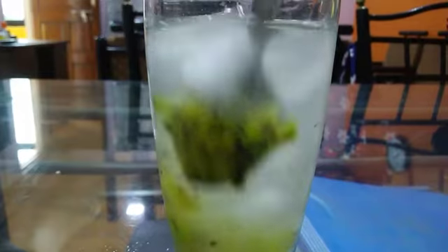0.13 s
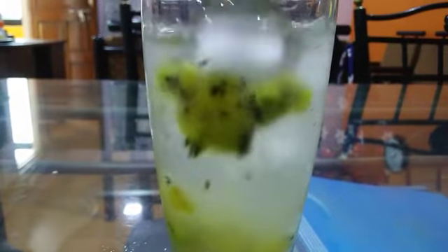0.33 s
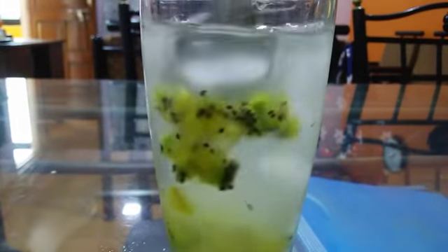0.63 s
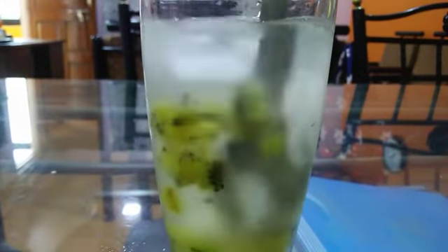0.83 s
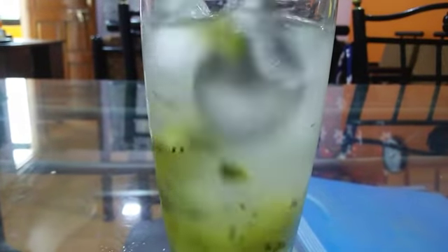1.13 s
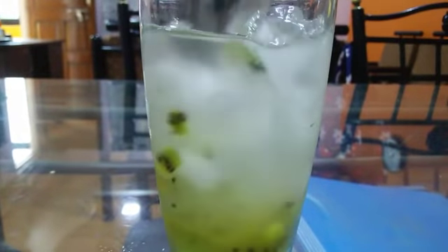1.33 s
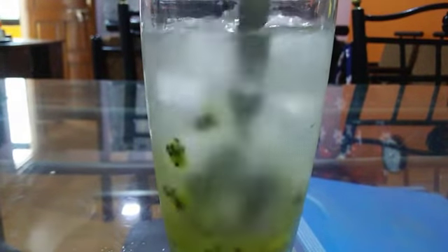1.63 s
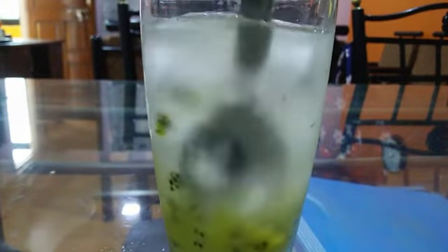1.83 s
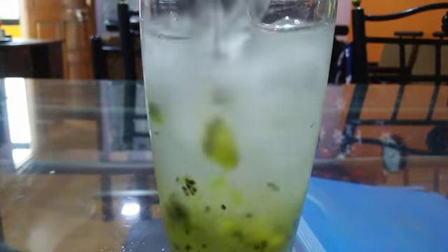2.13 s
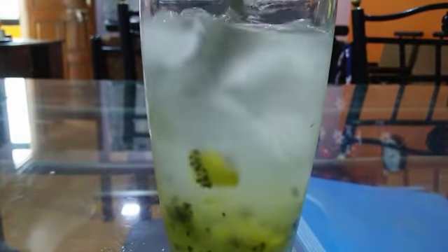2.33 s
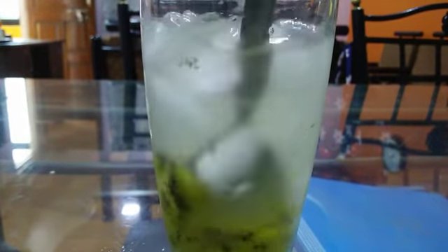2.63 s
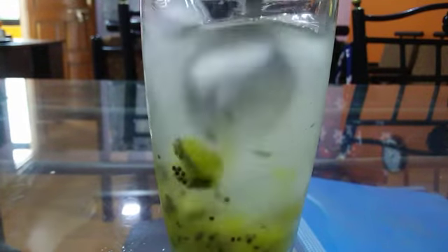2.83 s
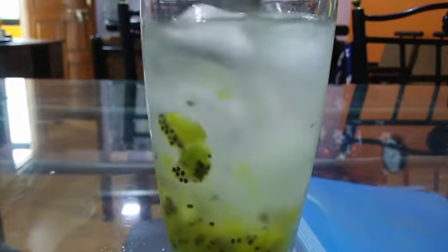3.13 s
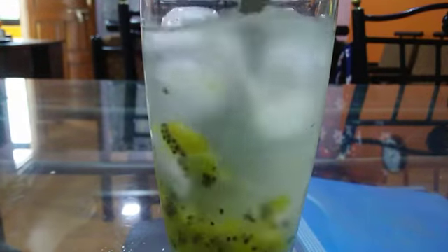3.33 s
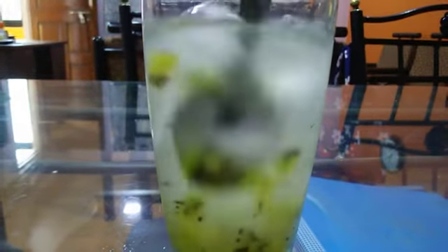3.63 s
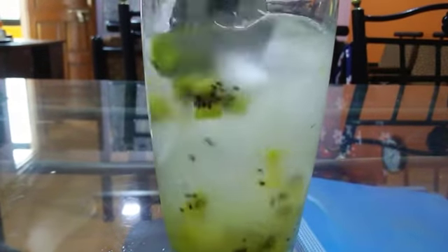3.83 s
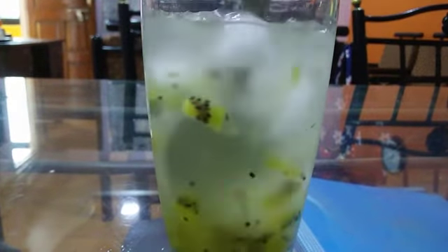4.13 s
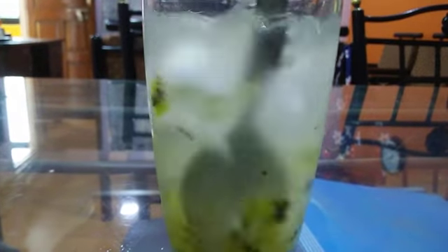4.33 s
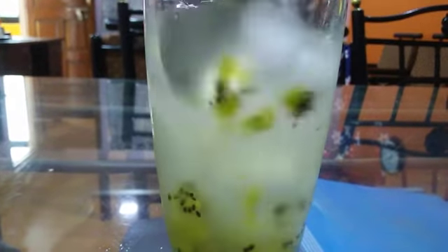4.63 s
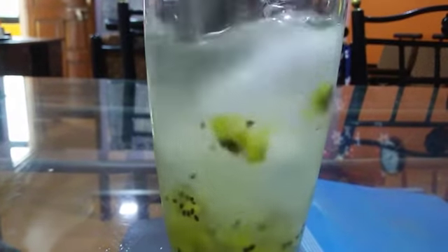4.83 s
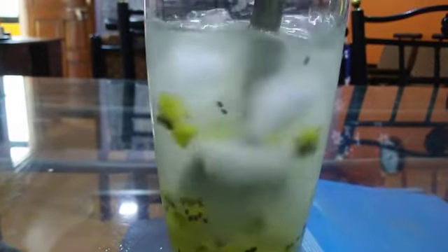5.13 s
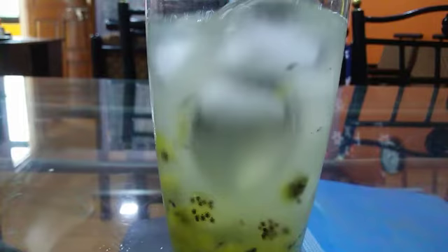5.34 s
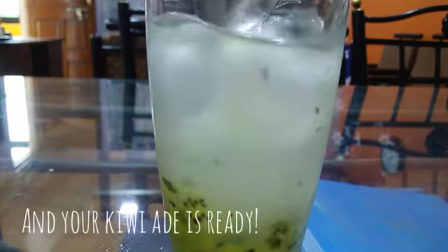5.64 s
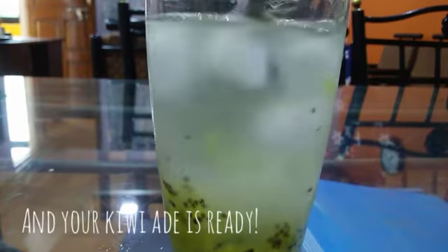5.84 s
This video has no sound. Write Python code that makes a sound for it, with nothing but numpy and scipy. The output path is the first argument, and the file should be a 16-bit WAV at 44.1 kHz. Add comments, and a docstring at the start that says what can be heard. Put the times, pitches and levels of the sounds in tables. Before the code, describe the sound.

A metal spoon stirs ice in a tall, full glass on a table. Sparse clinks and muffled knocks at first soon become a dense, irregular stream of bright glass taps, ice ticks and light slosh. It thins slightly near the end but never stops. Soft bubble hiss and a faint, very high whine sit underneath. Small room, one close microphone, little bass.

```python
"""Bright clinks stand out: ice cubes and a metal spoon tap the wall of a tall, full glass being stirred.
Each clink rings two fading modes of the wall, with a tick of ice, a metal edge and a brief chatter.
Cubes knock dully through the table, and many random touches make the rattle and slosh of stirring.
Tiny bursting bubbles hiss, a small room answers with fading noise echoes, and a faint high whine
made of steady tones switches on and off. One close microphone hears it all."""
import sys
import numpy as np
from scipy import signal
from scipy.io import wavfile
from scipy.ndimage import uniform_filter1d

SR = 44100
rng = np.random.default_rng(int(sys.argv[2]) if len(sys.argv) > 2 else 0)


def materialize(psi):
    """Save the field psi as 16-bit PCM at rate SR to the path in sys.argv[1].

    A 1-D psi becomes a single channel; in a 2-D psi each row is a channel.
    """
    bounded = np.clip(np.atleast_2d(psi).T, -1, 1)
    quanta = np.round(bounded * 32767).astype(np.int16)
    wavfile.write(sys.argv[1], SR, quanta)


N = 264159  # length in samples

# modes of the lower wall ring: (ratio_to_ring_pitch, relative_level_db, time_to_fall_60_db_s)
LOWER_RING = [(1, -2, .14), (.943, -6, .1), (1.025, -10, .08), (.968, -9, .08)]
# low modes of the table top: (pitch_hz, relative_level_db, time_to_fall_60_db_s)
TABLE_LOW = [(456, -7.5, 0.08), (518.7, -10.5, 0.14), (573, -10, .12), (644, -8, .12), (720.6, -4.5, 0.13),
             (824, -10, 0.23)]
# jostling of the cubes as the spoon works: (time_s, base_level_of_small_touches_db)
STIR = [(0.0, -42.5), (0.1, -56.5), (0.25, -61.5), (0.45, -50.5), (0.75, -51), (0.9, -42.5), (1.07, -42),
        (1.14, -48.5), (1.3, -51), (1.38, -50.5), (1.47, -41), (1.8, -49), (2.1, -46), (2.26, -61),
        (2.32, -45.5), (2.8, -48), (2.9, -46), (3.2, -49.5), (3.32, -44.5), (3.7, -50), (3.78, -54),
        (4.1, -45), (4.45, -47.5), (4.7, -54.5), (4.77, -48.5), (4.95, -49.5), (5.0, -43), (5.2, -51),
        (5.75, -52.5), (5.85, -49.5), (5.99, -50)]
TABLE_CUT_HZ = 460  # blows and rumble lose what lies below this


def undb(db):
    """Turn decibels into gain."""
    return 10 ** (np.asarray(db) / 20)


def unit(x):
    """Scale to an rms (average strength) of 1."""
    return x / np.sqrt(np.mean(x ** 2))


def band(x, hz, width):
    """Keep a band of pitches of the given width in Hz, with gentle slopes."""
    edges = [max(hz - width / 2, 20), hz + width / 2]
    return signal.sosfilt(signal.butter(2, edges, "bandpass", fs=SR, output="sos"), x)


def steep(x, hz, kind):
    """Cut steeply below hz ("highpass") or above it ("lowpass")."""
    return signal.sosfilt(signal.butter(6, hz, kind, fs=SR, output="sos"), x)


def curves(table):
    """Join the points of each table column into a curve with one value per sample."""
    time_s, *columns = np.transpose(table)
    return [np.interp(np.arange(N) / SR, time_s, column) for column in columns]


def wander(per_s):
    """Random levels, each held for 1 / per_s seconds, with smoothed steps and an rms of 1."""
    hold = int(SR / per_s)
    steps = np.repeat(rng.standard_normal(N // hold + 1), hold)[:N]
    return unit(uniform_filter1d(steps, size=hold // 2))


def touches(per_s, scatter_db):
    """Random small contacts, some stronger than the rest."""
    hit = rng.random(N) < per_s / SR
    boost = np.minimum(rng.exponential(size=N), np.pi)
    return hit * rng.standard_normal(N) * undb(scatter_db * boost)


def ring(start_s, hz, db, t60, spread_db=3.5, detune=0.0069, push_ms=0.41, in_step=False):
    """One decaying mode (60 dB down after t60 seconds); each blow excites it a little differently."""
    t = np.arange(int(t60 * SR)) / SR
    chance = rng.standard_normal((len(start_s), 3))
    hz = (hz * (1 + detune * chance[:, 0]))[:, None]
    sign = 1 if in_step else np.sign(chance[:, 2])
    gain = undb(db + spread_db * chance[:, 1]) * sign
    decay = undb(-60 * t / t60)
    push = 1 - np.exp(-t * 1000 / push_ms)
    waves = gain[:, None] * np.sin(2 * np.pi * hz * t) * decay * push
    # add every wave into one track at its own moment
    at = (np.asarray(start_s) * SR).astype(int)[:, None] + np.arange(len(t))
    return np.bincount(at.ravel(), waves.ravel(), N + SR)[:N]


def whine():
    """A steady cluster of high tones, mostly 200 Hz apart, gated on and off."""
    # tones: (pitch_hz, rms_level_db)
    whine_tones = [(12000, -91), (12800, -97), (13000, -89), (13200, -97), (13400, -93), (13600, -83),
                   (13800, -82), (14000, -72), (14200, -89), (14400, -96)]
    # longer stretches of whine: (start_s, end_s)
    held_spans = [(.29, .45), (.845, 1.04), (1.58, 1.72), (2.125, 2.69), (2.99, 3.255), (3.5, 3.675),
                  (4.78, 4.925), (5.1, 5.825)]
    first_s, every_s, blip_s = .3, .32, .03  # short blips at a steady beat
    t = np.arange(N) / SR
    blips = (t > first_s) & ((t - first_s) % every_s < blip_s)
    held = np.any([(t > start) & (t < end) for start, end in held_spans], axis=0)
    on = blips | held
    tones = sum(np.sqrt(2) * undb(db) * np.sin(2 * np.pi * (hz * t + rng.random()))
                for hz, db in whine_tones)
    return tones * uniform_filter1d(1. * on, size=200)  # soften each switch


def spray():
    """Tiny bursting bubbles at the surface, dense enough to hiss."""
    # base levels, before the mix below: (time_s, airy_hiss_db, lower_hiss_db)
    spray_levels = [(0.0, -88, -70), (0.28, -97, -92), (0.65, -91, -83), (0.84, -96, -39.5),
                    (0.98, -76, -44.5), (1.13, -74, -44), (1.27, -86, -52), (1.5, -87, -67),
                    (1.79, -91, -52), (1.97, -89, -74), (2.15, -89, -54), (2.53, -89, -58),
                    (2.69, -98, -71), (3.09, -84, -62), (3.6, -86, -58.5), (3.87, -91, -60),
                    (4.0, -92, -73), (4.75, -90, -69), (5.04, -89, -66), (5.22, -92, -43), (5.3, -94, -67),
                    (5.54, -87, -71), (5.99, -89, -53)]
    airy_db, lower_db = curves(spray_levels)
    fizz = touches(9000, 1.7)
    airy = unit(band(fizz, 10550, 2400)) + undb(-1.5) * unit(band(fizz, 13600, 3600))
    wide = unit(band(fizz, 5850, 3500)) * undb(lower_db - 7)
    narrow = unit(band(fizz, 5850, 500)) * undb(lower_db - 21.0)
    return airy * undb(airy_db) + wide + narrow


def swells():
    """Gains of the low rumble: a fast rise, a hold and a fade, at a set rate for each layer."""
    # swells of low rumble: (start_s, hold_s, rumble_db, low_part_db, deep_part_db)
    swell_rows = [(0.0, 0.013, -57.5, -71, -74), (0.36, .05, -64, -70, -84), (0.43, 0.21, -56.5, -64, -79),
                  (0.636, 0.1, -45, -57.5, -74), (0.765, 0.13, -47.5, -58, -74), (0.928, .1, -49, -59, -75),
                  (1.101, 0.17, -52.5, -53.5, -61.5), (1.449, .06, -45, -57.5, -63),
                  (1.57, 0.088, -50.5, -56.5, -70), (1.748, 0.074, -48, -50, -59),
                  (1.92, 0.14, -54, -61.5, -76), (2.307, .1, -53, -55, -73),
                  (2.398, 0.18, -52.5, -52.5, -63), (2.598, 0.078, -48.5, -53.5, -67),
                  (2.86, 0.03, -48.5, -62, -70), (2.96, 0.034, -51, -63.5, -69),
                  (3.07, 0.079, -52, -52, -62.5), (3.227, 0.16, -49.5, -56, -70),
                  (3.546, 0.13, -45.5, -57, -71), (3.74, 0.21, -57, -55, -61.5),
                  (4.064, 0.12, -53, -61.5, -74), (4.27, .08, -49, -56, -70),
                  (4.37, .22, -54.5, -53.5, -60), (4.74, 0.12, -62, -79.5, -77.5),
                  (4.991, 0.3, -52, -55.5, -58.5), (5.487, 0.17, -58.5, -80, -78),
                  (5.813, .09, -50, -51.5, -62), (5.93, .06, -55, -56, -58)]
    attack_s = 0.0093
    fades_db_per_s = (80.5, 125, 202)  # rumble, low part, deep part
    t = np.arange(0, N, 64) / SR  # a coarse time grid is enough for slow gains
    start, hold, *levels = np.transpose(swell_rows)[:, :, None]
    rise = np.clip((t - start) / attack_s, 0, 1)
    after = np.maximum(t - start - hold, 0)
    # where swells overlap, the strongest one counts
    gains = [(rise * undb(db - fade * after)).max(axis=0) for db, fade in zip(levels, fades_db_per_s)]
    return [np.interp(np.arange(N) / SR, t, gain) for gain in gains]


def hum(ring_hz):
    """Small touches keep the lower ring sounding; each mode remembers them for a while."""
    turns = np.cumsum(ring_hz) / SR
    out = 0
    for ratio, db, t60 in LOWER_RING:
        # two sets of touches push the mode's two quarter-turn-apart parts
        push_a = uniform_filter1d(touches(1500, 1.8), size=60)
        push_b = uniform_filter1d(touches(1500, 2.8), size=60)
        kept_per_sample = undb(-60 / t60 / SR)
        swing = signal.lfilter([1], [1, -kept_per_sample], push_a + 1j * push_b)
        wave = (swing * np.exp(2j * np.pi * ratio * turns)).real
        out = out + undb(db) * unit(wave)
    return out


def churn(ring_hz):
    """Cubes jostle all the time: many small touches feed table, wall and ice; the drink sloshes."""
    # bands of the ice rattle: (pitch_hz, width_hz, relative_level_db)
    rattle_bands = [(1183, 110, -8), (1392, 260, -6), (2010, 610, 2.5), (2670, 400, -2), (3400, 750, -1.5),
                    (4450, 140, -0.5), (5235, 760, -6), (5800, 1200, -19.5), (8000, 2100, -35)]
    rattle_flicker_db, hum_db, hum_flicker_db = 3.5, -4, 3  # hum_db is relative to the rattle
    contact_hz, tick_scatter_db = 8500, 4.6  # the touches are dull above contact_hz
    stir_db = curves(STIR)[0]
    rattle_gain = undb(stir_db + rattle_flicker_db * wander(25))
    hum_gain = undb(stir_db + hum_db + hum_flicker_db * wander(14))

    bumps = touches(900, 3.2)
    rumble = sum(undb(db) * unit(band(bumps, hz, 54)) for hz, db, _ in TABLE_LOW)
    rumble = rumble + 1.7 * unit(band(bumps, 668, 520))
    rumble = steep(rumble, TABLE_CUT_HZ, "highpass")

    slosh = touches(350, 2.2)
    low = band(band(slosh, 392, 140), 392, 140)
    deep = band(band(slosh, 272, 220), 272, 220)

    ticks = steep(touches(1800, tick_scatter_db), contact_hz, "lowpass")
    rattle = sum(undb(db) * unit(band(ticks, hz, width)) for hz, width, db in rattle_bands)

    layers = (rumble, low, deep, rattle, hum(ring_hz))
    gains = (*swells(), rattle_gain, hum_gain)
    return sum(unit(layer) * gain for layer, gain in zip(layers, gains))


def knocks():
    """Cubes and spoon knock on the bottom: a short thump at its own pitch, then the table top hums on."""
    # dull knocks, base levels: (start_s, thump_and_low_table_db, upper_table_modes_db, pitch_hz)
    knock_rows = [(0.071, -41.5, -36, 750), (0.165, -43, -34, 707), (0.238, -69, -45.5, 616),
                  (0.29, -69, -40.5, 880), (0.363, -44.5, -36.5, 810), (0.482, -44, -31.5, 790),
                  (0.54, -46, -36, 700), (0.632, -32, -37, 736), (0.712, -28.5, -35, 707),
                  (0.764, -48, -51, 580), (0.854, -29, -24.5, 660), (0.954, -34.5, -35, 703),
                  (1.045, -33, -33, 820), (1.203, -28, -32.5, 666), (1.392, -40, -43, 693),
                  (1.436, -39, -31.5, 655), (1.501, -30.5, -35, 726), (1.59, -25.5, -32, 603),
                  (1.655, -34.5, -37, 612), (1.746, -41, -42, 737), (1.922, -35.5, -65, 640),
                  (2.009, -26, -38, 627), (2.135, -40.5, -38, 794), (2.193, -36, -58, 630),
                  (2.284, -33, -58, 424), (2.35, -34, -38, 590), (2.386, -29, -46, 505),
                  (2.593, -30.5, -37, 536), (2.722, -33, -27.5, 650), (2.774, -34.5, -30, 685),
                  (2.866, -30.5, -29, 626), (2.967, -37.5, -53, 807), (3.125, -32, -44.5, 620),
                  (3.25, -28.5, -42, 516), (3.438, -39, -42, 620), (3.476, -38.5, -42, 650),
                  (3.56, -26.5, -28, 587), (3.727, -31.5, -42, 610), (3.789, -31.5, -37, 640),
                  (3.904, -32, -51, 610), (3.934, -31.5, -45, 520), (4.081, -32.5, -36, 841),
                  (4.19, -32, -39, 647), (4.262, -22, -22.5, 708), (4.395, -24.5, -29, 615),
                  (4.463, -35, -43, 690), (4.592, -32, -41, 606), (4.721, -49, -40, 650),
                  (4.75, -37.5, -50, 630), (4.813, -34, -37, 743), (4.934, -54, -38, 740),
                  (5.007, -23, -33, 610), (5.13, -41, -58, 594), (5.186, -31.5, -34, 714),
                  (5.5, -37.5, -39, 590), (5.601, -42, -42, 663), (5.783, -42, -46, 545),
                  (5.828, -36, -39, 456), (5.851, -28, -51, 496), (5.9, -41, -55, 760)]
    # upper modes of the table top: (pitch_hz, relative_level_db, time_to_fall_60_db_s)
    table_high = [(1054, -17, 0.14), (1166.4, -7.5, 0.14), (1233.4, -4, 0.059)]
    start_s, low_db, high_db, pitch_hz = np.transpose(knock_rows)
    thump = ring(start_s, pitch_hz, low_db + 0.5, 0.033, spread_db=2.1, push_ms=2.34)
    low = sum(ring(start_s, hz, low_db + db - 7.5, t60, spread_db=2.5, push_ms=3.5)
              for hz, db, t60 in TABLE_LOW)
    high = sum(ring(start_s, hz, high_db + db, t60, spread_db=2.0, push_ms=0.4)
               for hz, db, t60 in table_high)
    return thump + low + high


def light_clinks():
    """Light clinks between the loud ones, at random moments, as strong as the stirring."""
    per_s, scatter_db = 20, 3.5
    upper_db, lower_db, tick_db, edge_db = 10.5, 2, 6.5, -1  # relative to the stirring level
    upper_hz, upper_spread_hz = 4460, 150
    tick_low_hz, tick_high_hz = 2060, 3700
    count = int(per_s * N / SR)
    chance = rng.standard_normal((count, 5)).T
    place = rng.random((count, 2)).T
    start_s = place[0] * N / SR
    db = np.interp(start_s, *np.transpose(STIR)) + scatter_db * chance[:4]
    tick_hz = tick_low_hz + (tick_high_hz - tick_low_hz) * place[1]
    return np.transpose([start_s, db[0] + upper_db, upper_hz + upper_spread_hz * chance[4],
                         db[1] + lower_db, db[2] + tick_db, tick_hz, db[3] + edge_db])


def clinks(ring_hz):
    """Each clink rings both wall modes, with a tick of ice, a bright metal edge and a brief chatter."""
    # loud clinks, base levels: (start_s, upper_ring_db, upper_ring_hz, lower_ring_db,
    # ice_tick_db, tick_hz, bright_edge_db)
    loud_clinks = [(0.0041, -22, 4460, -44, -40, 3750, -48), (0.1076, -32.5, 4320, -34.5, -31, 2050, -65),
                   (0.1337, -37.5, 4450, -48, -44, 2170, -55), (0.1716, -39.5, 4500, -36.5, -36, 3000, -50),
                   (0.2905, -36.5, 4360, -38, -26.5, 2070, -49), (0.3589, -36.5, 4750, -41, -32, 2140, -54),
                   (0.437, -45, 4530, -40, -33.5, 2060, -65), (0.4575, -42, 4430, -46, -33, 3730, -61),
                   (0.4729, -27, 4520, -32, -41, 3280, -37), (0.4826, -16, 4540, -30.5, -20.5, 2140, -35),
                   (0.5069, -31, 4460, -40, -36, 2050, -41), (0.5283, -26, 4480, -53, -36, 2090, -33.5),
                   (0.5386, -30, 4570, -41, -30.5, 3690, -40), (0.5853, -32, 4680, -36, -30, 2650, -41),
                   (0.6307, -32, 4430, -54, -30, 3740, -46), (0.6607, -34, 4460, -30.5, -29, 2050, -49),
                   (0.7528, -55, 4210, -42, -38, 2630, -37), (0.8302, -52, 4530, -35, -31, 2170, -38),
                   (0.8563, -35, 4640, -27.5, -20, 2440, -37), (0.868, -27.5, 4480, -27, -21.5, 2250, -33),
                   (0.8876, -34, 4520, -35, -33, 2160, -39), (0.9156, -44, 4300, -42, -36, 2060, -43),
                   (0.9513, -21, 4460, -40, -31, 2050, -43), (1.0123, -43, 4600, -42, -29.5, 2940, -41),
                   (1.0487, -42, 4600, -45, -25.5, 3560, -23), (1.0917, -29, 4530, -32.5, -33, 2070, -40),
                   (1.2024, -33, 4520, -33, -25, 3300, -35), (1.2265, -26.5, 4530, -24.5, -28, 3700, -44),
                   (1.2402, -25, 4500, -28, -21, 3680, -38), (1.2498, -30, 4030, -49, -28, 2050, -35),
                   (1.2763, -27, 4440, -55, -27, 3680, -29), (1.3239, -37, 4340, -43, -36, 3550, -43),
                   (1.3318, -26, 4510, -45, -37, 3000, -45), (1.3467, -32, 4620, -50, -33, 3500, -33.5),
                   (1.4259, -28, 4430, -52, -41, 3040, -36), (1.4367, -16, 4460, -23.5, -25, 3730, -39),
                   (1.4468, -30, 4440, -40, -41, 3700, -34), (1.4829, -24.5, 4420, -44, -35, 3530, -31),
                   (1.4997, -33, 4430, -33, -33, 3400, -37), (1.5521, -26, 4450, -28.5, -35, 2060, -45),
                   (1.6042, -31.5, 4260, -32, -30.5, 2570, -42),
                   (1.6746, -20.5, 4470, -48, -23.5, 2780, -44), (1.7365, -23.5, 4470, -49, -52, 3610, -29),
                   (1.766, -18.5, 4470, -32.5, -23, 2210, -24), (1.813, -30, 4450, -52, -41, 3450, -32),
                   (1.8444, -27.5, 4480, -41, -36, 2050, -29), (1.884, -19, 4450, -32, -20.5, 2760, -19),
                   (1.9228, -20.5, 4480, -32, -32, 2210, -37), (1.9496, -31, 4460, -33, -47, 2050, -34),
                   (1.9659, -22, 4460, -33.5, -35, 2100, -31.5), (2.0007, -30, 4460, -28, -34, 2450, -47),
                   (2.073, -22.5, 4500, -31, -41, 3400, -45), (2.0883, -32, 4430, -35, -41, 2050, -49),
                   (2.1085, -29.5, 4560, -41, -43, 2960, -39), (2.1344, -17, 4420, -35, -25, 2030, -23),
                   (2.1868, -31, 4330, -43, -37, 3360, -49),
                   (2.1955, -17.5, 4470, -28.5, -24.5, 2920, -27.5),
                   (2.2827, -29.5, 4580, -41, -22, 3580, -33), (2.2951, -29, 4540, -33, -33, 3390, -36),
                   (2.3122, -30, 4340, -30, -29, 2010, -34), (2.3522, -25.5, 4420, -26.5, -28, 2050, -32),
                   (2.371, -33, 4300, -32, -35, 2480, -39), (2.397, -23, 4410, -38, -39, 2050, -24),
                   (2.4118, -26, 4510, -36, -45, 3420, -35), (2.4379, -26, 4520, -36, -39, 2050, -41),
                   (2.4943, -23.5, 4500, -43, -35, 3690, -46), (2.5137, -28, 4470, -48, -38, 3690, -45),
                   (2.5279, -23, 4460, -29.5, -33, 2640, -33), (2.5516, -26, 4460, -46, -33, 3240, -42),
                   (2.5935, -25.5, 4500, -42, -18, 3330, -29), (2.6285, -19.5, 4440, -38, -29.5, 2730, -34),
                   (2.6425, -28, 4620, -54, -22, 2600, -44), (2.6492, -22.5, 4430, -38, -35, 3640, -41),
                   (2.6629, -22, 4460, -31, -29, 2020, -36), (2.6918, -27.5, 4480, -39, -31, 2740, -40),
                   (2.7239, -30.5, 4580, -26, -29, 2110, -47), (2.7381, -31, 4390, -36, -36, 2540, -53),
                   (2.8038, -32, 4450, -43, -39, 2080, -55), (2.8597, -24, 4480, -28, -34, 2860, -39),
                   (2.8666, -18.5, 4380, -24, -23.5, 2050, -41), (2.8731, -20.5, 4410, -34, -34, 3690, -37),
                   (2.8847, -28, 4420, -26.5, -33, 2050, -34), (2.9015, -21, 4450, -46, -37, 3610, -41),
                   (2.9096, -19, 4350, -34, -27, 3690, -30), (2.95, -26, 4390, -42, -30, 3000, -33),
                   (2.9625, -30, 4500, -42, -30, 3300, -30), (2.9669, -20, 4510, -37, -28, 3300, -29.5),
                   (2.9913, -23.5, 4460, -46, -32, 2950, -31.5), (3.0366, -26.5, 4580, -27, -24, 3330, -30),
                   (3.0842, -25.5, 4550, -47, -41, 3360, -37), (3.1146, -30, 4600, -42, -32, 3500, -47),
                   (3.1254, -26, 4460, -40, -21.5, 3420, -41), (3.1355, -27.5, 4600, -33, -34, 3570, -42),
                   (3.1608, -26, 4490, -52, -39, 3460, -48), (3.2089, -25, 4500, -45, -46, 2060, -42),
                   (3.223, -23, 4530, -45, -40, 3690, -33), (3.2505, -16.5, 4580, -27, -31.5, 2050, -18),
                   (3.2629, -20.5, 4450, -33.5, -32, 3400, -36),
                   (3.2875, -20.5, 4520, -36, -31, 2050, -30.5), (3.3144, -20.5, 4540, -52, -24, 2530, -30),
                   (3.3318, -20.5, 4570, -52, -26, 2630, -37), (3.4241, -33, 4640, -35, -38, 2890, -36),
                   (3.4388, -13, 4530, -27, -35, 2050, -26.5), (3.4889, -19.5, 4460, -35, -32, 2740, -44),
                   (3.5318, -32.5, 4360, -49, -38, 2620, -42), (3.5585, -22, 4500, -32, -28, 2600, -36),
                   (3.563, -18, 4530, -22.5, -18, 2060, -31), (3.5962, -32, 4400, -36, -26, 2500, -36),
                   (3.6, -24, 4570, -31, -23, 2800, -36), (3.6166, -17, 4460, -26, -23, 2480, -29),
                   (3.6376, -23, 4400, -28, -22, 3450, -27), (3.6721, -26, 4400, -33, -33, 2360, -38),
                   (3.728, -51, 4660, -52, -35, 2470, -60), (3.754, -38, 4450, -41, -32, 3420, -47),
                   (3.789, -12, 4490, -31, -19.5, 2500, -15), (3.7989, -39, 4460, -52, -37, 2360, -41),
                   (3.903, -28.5, 4850, -32, -33, 2660, -33), (3.9358, -22.5, 4530, -49, -23, 3690, -40),
                   (3.9499, -27, 4820, -44, -26.5, 3530, -33.5), (3.9676, -26, 4580, -48, -30, 3570, -33),
                   (4.01, -26.5, 4460, -38, -30, 3400, -38), (4.0644, -37, 4620, -34, -27, 2640, -33),
                   (4.0826, -25.5, 4120, -27.5, -24.5, 2540, -35.5),
                   (4.144, -29, 4560, -49, -33, 3670, -35), (4.1636, -30, 4120, -36, -30.5, 3700, -43),
                   (4.1898, -22, 4400, -34, -29, 2500, -35.5), (4.2678, -29.5, 4380, -31, -29, 2350, -44),
                   (4.3382, -25, 4460, -34, -35, 3690, -31), (4.3871, -18.5, 4340, -29.5, -28.5, 3300, -37),
                   (4.4127, -30, 4400, -42, -40, 2140, -35), (4.4529, -46, 4400, -48, -43, 2450, -43),
                   (4.4622, -11.5, 4360, -29, -21.5, 2490, -25.5), (4.4915, -38, 4120, -33, -40, 3690, -47),
                   (4.5671, -30, 4340, -31, -36, 3400, -39), (4.6361, -30, 4520, -45, -33.5, 3730, -29.5),
                   (4.7221, -32, 4450, -48, -36.5, 2570, -36), (4.7481, -26, 4550, -26, -31.5, 2000, -43),
                   (4.7577, -24, 4450, -48, -34, 3170, -37), (4.8146, -29, 4580, -36, -33, 2870, -36.5),
                   (4.8215, -26, 4390, -41, -38, 3430, -46), (4.8434, -30, 4640, -47, -28, 2960, -46),
                   (4.855, -34, 4460, -37, -30, 3680, -45), (4.8727, -29.5, 4430, -52, -44, 3220, -44),
                   (4.9346, -27, 4940, -32, -23, 3460, -25), (4.9435, -22, 4400, -36, -32, 3690, -30),
                   (4.9523, -21, 4370, -28, -32, 2780, -36), (4.9593, -29, 4300, -26.5, -35, 3700, -41),
                   (4.9888, -30, 4500, -28, -29, 2050, -31), (5.0282, -26, 4600, -28, -29, 3610, -28),
                   (5.0469, -30, 4450, -48, -49, 3350, -31), (5.0689, -22, 4440, -34, -40, 3380, -27),
                   (5.0786, -32, 4050, -43, -33, 3690, -34), (5.1339, -19.5, 4370, -34, -33, 3440, -35),
                   (5.1485, -47, 4650, -32, -27, 3350, -29), (5.1708, -16, 4360, -43, -21.5, 3660, -36),
                   (5.1864, -11.5, 4380, -21.5, -23, 2500, -25), (5.2006, -29, 4250, -28, -25, 2570, -47),
                   (5.238, -33, 4350, -35, -30, 2060, -32), (5.323, -34.5, 4400, -39, -39, 2770, -52),
                   (5.376, -31.5, 4350, -39, -40, 2090, -51), (5.3862, -33.5, 4430, -45, -48, 2740, -60),
                   (5.4373, -36, 4230, -41, -39, 2170, -47), (5.4598, -31.5, 4390, -53, -38, 3430, -37),
                   (5.5002, -26.5, 4790, -37.5, -31, 3690, -38),
                   (5.5068, -30.5, 4660, -35.5, -33, 2590, -35), (5.6019, -35, 4120, -44, -31, 3470, -44),
                   (5.6074, -27.5, 4010, -34, -32.5, 3540, -30.5), (5.6203, -29, 4500, -46, -32, 2700, -46),
                   (5.6307, -29, 4560, -31.5, -37, 2570, -39), (5.6884, -27, 4560, -34.5, -28, 3400, -41),
                   (5.7074, -28, 4430, -43, -38, 3340, -40), (5.7816, -30, 4370, -37, -26.5, 2910, -31),
                   (5.8292, -34, 4780, -32.5, -31, 2300, -35), (5.8439, -28.5, 4090, -31, -31, 3070, -38),
                   (5.861, -33, 4170, -34, -33, 2200, -41), (5.8757, -38, 4330, -30.5, -47, 2050, -30.5),
                   (5.9025, -33, 4300, -45, -37, 3690, -39), (5.9813, -36, 4380, -45, -37, 3150, -34)]
    # modes of the upper wall ring: (ratio_to_ring_pitch, relative_level_db, time_to_fall_60_db_s)
    upper_ring = [(.993, -6, .035), (1.007, -6, .035), (1.06, -22, .015), (.95, -24, .015),
                  (1.001, -24, .1)]
    # modes of the bright edge: (pitch_hz, relative_level_db, time_to_fall_60_db_s)
    edge_modes = [(5450, -1, 0.006), (6235, -4.5, 0.014), (7320, -4.5, 0.013), (8020, -9.5, 0.015),
                  (8780, -22, 0.016), (10070, -38, 0.0069), (11150, -42, 0.0055), (13000, -32.5, .005),
                  (14600, -34, .004)]
    chatter_delay_s, chatter_db = (.002, .012), -7.5  # delay range, level of each repeat
    rows = np.vstack([loud_clinks, light_clinks()])
    start_s, upper_db, upper_hz, lower_db, tick_db, tick_hz, edge_db = rows.T
    lower_hz = ring_hz[(start_s * SR).astype(int)]

    # the two strongest upper modes are a close pair: they start in step and cancel within a few ms
    upper = sum(ring(start_s, upper_hz * ratio, upper_db + db, t60, spread_db=0.7,
                     detune=0.00076, push_ms=0.16, in_step=True) for ratio, db, t60 in upper_ring)
    lower = sum(ring(start_s, lower_hz * ratio, lower_db + db, t60, detune=0.0028, push_ms=0.15)
                for ratio, db, t60 in LOWER_RING)
    tick = ring(start_s, tick_hz, tick_db, 0.011, spread_db=0.2)
    crack = sum(ring(start_s, hz, tick_db - 7, 0.01, detune=0.12, push_ms=0.27)
                for hz in (1395, 2300, 3000, 3870))
    edge = sum(ring(start_s, hz, edge_db + db, t60, spread_db=3.5, detune=0.045, push_ms=0.4)
               for hz, db, t60 in edge_modes)

    # ice skids on after a blow: two late repeats
    late_s = start_s[:, None] + rng.uniform(*chatter_delay_s, size=(len(start_s), 2))
    chatter_modes = ((2500, tick_db), (3400, tick_db), (6000, edge_db), (7700, edge_db - 7))
    chatter = sum(ring(at_s, hz, db + chatter_db, 0.0061, detune=.12)
                  for at_s in late_s.T for hz, db in chatter_modes)
    return chatter + undb(1.0) * upper + undb(-4.5) * lower + tick + crack + undb(-3.5) * edge


def echoes():
    """Dense noise echoes that start about 7 ms after the blow; each band of pitches fades at its own rate."""
    # bands of the echo: (pitch_hz, width_hz, time_to_fall_60_db_s, relative_level_db)
    room_bands = [(500, 650, 0.41, 1.5), (1090, 620, 0.23, -5), (2220, 1400, 0.14, -6),
                  (4500, 2500, .3, -11), (7900, 4200, 0.33, -9)]
    t = np.arange(SR // 2) / SR
    onset = np.clip((t - .007) / 0.0005, 0, 1)
    tail = 0
    for hz, width, t60, db in room_bands:
        part = band(rng.standard_normal(len(t)), hz, width) * undb(-60 * t / t60) * onset
        # even out the energy by bandwidth before setting the level
        tail = tail + undb(db) * part / np.sqrt(np.sum(part ** 2) * SR / 2 / width)
    return tail


def room(x, count=6):
    """Each short stretch takes one of several noise echoes at random, so no fixed pitch stands out."""
    hop = SR // 25  # 40 ms in samples
    choice = np.repeat(rng.integers(count, size=N // hop + 1), hop)[:N]
    shares = (uniform_filter1d(1. * (choice == k), size=100) for k in range(count))
    return sum(signal.fftconvolve(x * share, echoes())[:N] for share in shares)


def scene():
    """Blows, their echoes, stirring, hiss and whine meet in one signal that feeds both channels."""
    # the lower ring wanders as ice and liquid load the wall
    lower_hz, wander_hz, wander_per_s = 1708, 11, 3
    ring_hz = lower_hz + wander_hz * wander(wander_per_s)
    hits = steep(clinks(ring_hz) + knocks(), TABLE_CUT_HZ, "highpass")
    mono = hits + room(hits) + churn(ring_hz) + spray() + whine()
    return np.array([mono, mono])


def record(dry):
    """The bass is cut steeply, a trace of low noise is added and the top is cut."""
    low_cut_hz, low_noise_db, top_hz = 250, -95, 15650
    noise = undb(low_noise_db) * unit(band(rng.standard_normal(N), 89, 190))
    x = steep(dry, low_cut_hz, "highpass") + noise
    return signal.sosfilt(signal.ellip(8, .2, 70, top_hz, fs=SR, output="sos"), x)


dry = scene()
out = record(dry)
materialize(out)
```